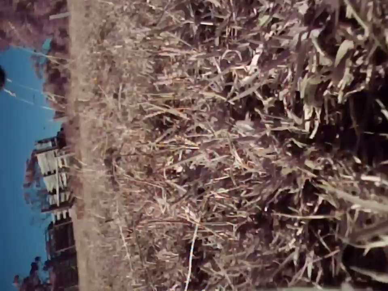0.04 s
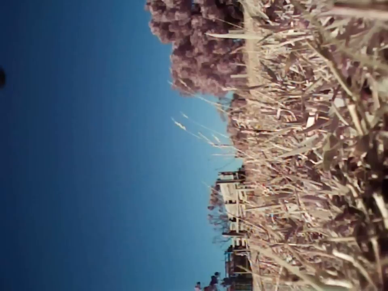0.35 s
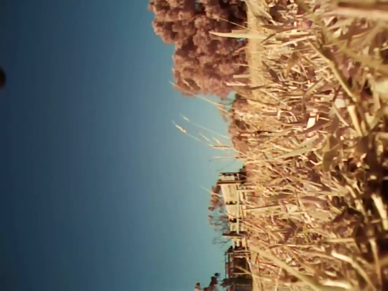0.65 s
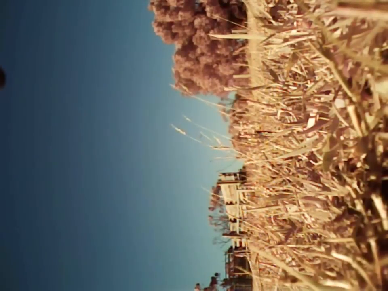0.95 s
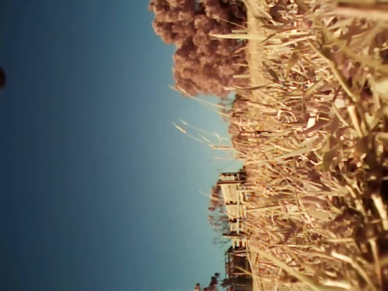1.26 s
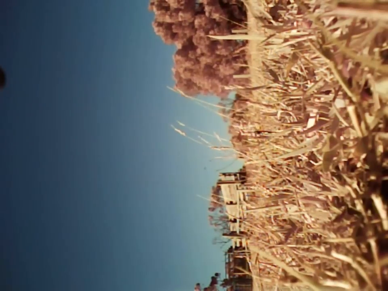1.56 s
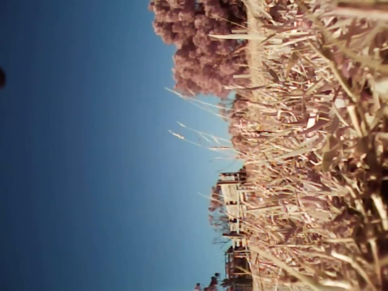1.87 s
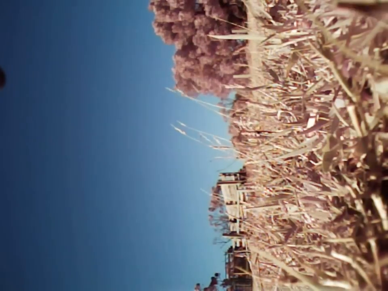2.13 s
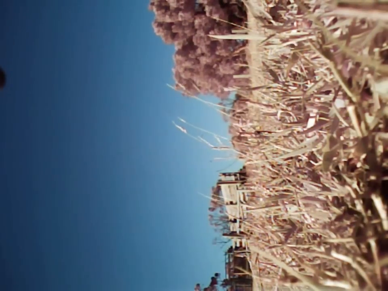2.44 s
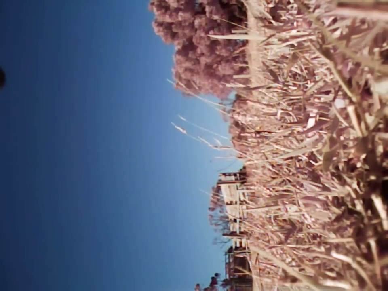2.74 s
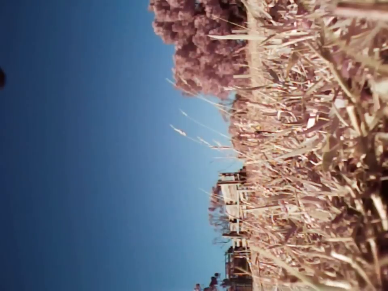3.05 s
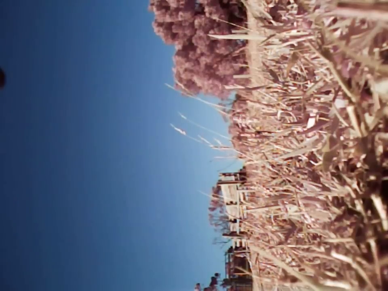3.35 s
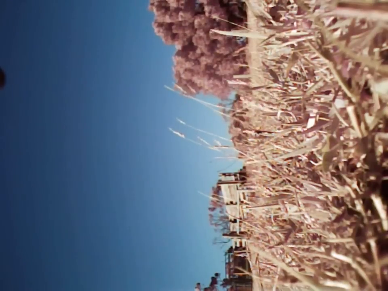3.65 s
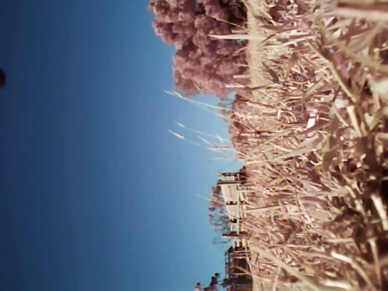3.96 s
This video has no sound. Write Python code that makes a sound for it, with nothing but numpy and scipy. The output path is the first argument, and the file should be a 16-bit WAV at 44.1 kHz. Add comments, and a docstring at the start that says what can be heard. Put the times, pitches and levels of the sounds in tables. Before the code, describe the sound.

A toy helicopter crashes into dry grass right at the start, heard from its own microphone. Blades chop stalks while the plastic hull thuds, clacks and drags, loud and distorted, stopping by 0.6 seconds. A faint gritty hiss and thin electronic whine continue throughout. Light wind puffs pass, mostly from 2 seconds on, and stalks tick against the hull at about 1.7 and 3.4 seconds.

```python
"""A toy helicopter drops into dry grass, heard from a tiny camera on its own body.
Hiss, a thin whine and a faint breeze are there from the start, made gritty by a coarse converter.
At once the blades chop into the stalks. The hull clacks, thuds, tumbles and drags for half a second,
overloading the microphone. Then it lies still: light gusts pass, and stalks tick on the hull."""
import sys
import numpy as np
from scipy import signal
from scipy.fft import rfft, irfft
from scipy.io import wavfile

SR = 44100
rng = np.random.default_rng(int(sys.argv[2]) if len(sys.argv) > 2 else 0)


def store_wav(level_fs):
    """Save 16-bit WAV to argv[1]."""
    pcm = np.round(np.clip(np.atleast_2d(level_fs), -1, 1) * 32767)
    wavfile.write(sys.argv[1], SR, pcm.T.astype(np.int16))


N = 176400
TIME = np.arange(N) / SR


def from_db(db):
    """Turn decibels into a number to multiply by."""
    return 10 ** (np.asarray(db) / 20)


def rms_one(x):
    """Scale a sound so that its average strength (rms) is 1."""
    return x / np.sqrt(np.mean(x ** 2) + 1e-20)


def butter(x, hz, kind, order):
    """Keep the "low" or the "high" part of a sound."""
    return signal.sosfilt(signal.butter(order, hz, kind, fs=SR, output="sos"), x)


def slow_noise(hz):
    """A random wobble of strength 1, mostly slower than hz."""
    return rms_one(butter(rng.standard_normal(N + SR), hz, "low", order=2)[SR:])


def resonate(x, hz, width_hz):
    """Let a sound ring around one pitch; a narrow width rings longer."""
    r = np.exp(-np.pi * width_hz / SR)
    b = (1 - r * r) / 2 * np.array([1, 0, -1])
    a = [1, -2 * r * np.cos(2 * np.pi * hz / SR), r * r]
    return signal.lfilter(b, a, signal.lfilter(b, a, x + 1e-18))


def noise_band(hz, width_hz):
    """Noise of strength 1 around one pitch."""
    return rms_one(resonate(rng.standard_normal(N), hz, width_hz))


def grains(per_s=5000, spread_db=3.5):
    """Dense random clicks of uneven size."""
    sizes = from_db(spread_db * np.minimum(rng.exponential(1, N), 4))
    signs = rng.choice([-1, 1], N)
    return sizes * signs * (rng.random(N) < per_s / SR)


def shake(resonances, force):
    """Tiny clicks make an object ring; its strength follows the force."""
    out, power = 0, 0
    for pitch_hz, width_hz, level_db in resonances:
        clicks = from_db(level_db) * grains()
        out = out + resonate(clicks * force, pitch_hz, width_hz)
        power += np.mean(resonate(clicks, pitch_hz, width_hz) ** 2)
    return out / np.sqrt(power)


# the tone of the microphone's hiss, from low to high: pitch_hz, relative_db
HISS_COLOUR = [(30, 1.5), (150, -1.5), (650, -3.5), (1500, -8), (4000, -20.5), (9000, -22), (16000, -28.5)]
def electronics(hiss_db=-42, whine_db=-51, whine_hz=8845):
    """The camera's electronics add a dull hiss and a thin, steady whine."""
    pitch_hz, relative_db = np.transpose(HISS_COLOUR)
    all_hz = np.fft.rfftfreq(N, 1 / SR)
    colour = from_db(np.interp(np.log(all_hz + 1), np.log(pitch_hz), relative_db))
    hiss = rms_one(irfft(rfft(rng.standard_normal(N)) * colour, N))
    whine = np.sin(2 * np.pi * whine_hz * TIME)
    return from_db(hiss_db) * hiss + from_db(whine_db) * whine


def breeze(level_db=-55.5, pitch_hz=140.6):
    """Gently moving air rumbles on the microphone."""
    return from_db(level_db) * noise_band(pitch_hz, width_hz=1.5 * pitch_hz)


# the hull sliding through the grass: time_s, crackle_db, rumble_db
DRAG_LEVELS = [(0, -36.5, -21.5), (0.029, -50, -26.5), (0.048, -28, -11.5), (0.066, -25, -22),
               (.15, -12, -6), (0.241, -21, -11.5), (0.274, -21, -13.5), (0.311, -9.5, -14),
               (0.337, -12, -16), (.36, -20, -19), (.40, -14, -23.5), (0.429, -8.5, -12), (.45, -23, -19.5),
               (0.473, -19, -20), (.50, -11.5, -22.5), (.53, -22.5, -29), (.56, -28, -27.5),
               (0.589, -36, -37), (0.661, -65, -39)]
def drag_forces(flutter_db=1.5):
    """How hard the dragging hull rubs its shell (unevenly) and shakes its frame."""
    time_s, crackle_db, rumble_db = np.transpose(DRAG_LEVELS)
    wobble_db = flutter_db * slow_noise(hz=70)
    crackle = from_db(np.interp(TIME, time_s, crackle_db, right=-np.inf) + wobble_db)
    rumble = from_db(np.interp(TIME, time_s, rumble_db, right=-np.inf))
    return crackle, rumble


def burst(start_s, decay_s):
    """The force of a hit: it jumps to 1, then dies away."""
    return (TIME >= start_s) * np.exp(-np.abs(TIME - start_s) / decay_s)


# blades and hull hitting the ground: start_s, crack_db, knock_db, snap_db, decay_s
GROUND_HITS = [(0.0297, -13.5, -32.5, -35, 0.0015), (0.055, 7, -0.5, -10.5, 0.022),
               (0.067, 17, -10, -27, 0.0049), (0.075, 7.5, -5, 2.5, 0.014), (0.096, 12.5, 1, 1, 0.0035),
               (0.108, 14, 12.5, -35, 0.0058), (0.126, 4, 6, -32, 0.0053), (.141, -11, -1, -5.5, 0.0027),
               (0.1534, 3, 5.5, -3, 0.004), (.175, 11.5, 8, -15, 0.005), (.203, -32, -15, -41, 0.0054),
               (0.2071, 8, 9.5, -18, 0.0039), (0.2279, 10, -2.5, -4, 0.0026),
               (0.238, -8.5, -36, -21, 0.0031), (0.289, 0, -11, -23, 0.0019),
               (0.311, -14, -11.5, -36, 0.0048), (0.3377, -12.5, -4.5, -27, 0.0021),
               (0.3686, -11, -17, -20, 0.0044), (0.391, 11.5, 1, 12, 0.0027),
               (0.409, -31, -16, -17, 0.0048), (.436, -6.5, -19, -12.5, 0.0056),
               (.458, -3, -2.5, -21, 0.0036), (0.506, -32, -17, -11.5, 0.0088),
               (0.5463, -12, -9, -18.5, 0.00074)]
def hit_forces():
    """How hard the hits crack against the shell, knock the frame and snap stalks."""
    cracks, knocks, snaps = 0, 0, 0
    for start_s, crack_db, knock_db, snap_db, decay_s in GROUND_HITS:
        hit = burst(start_s, decay_s)
        cracks = cracks + from_db(crack_db) * hit
        knocks = knocks + from_db(knock_db) * hit
        snaps = snaps + from_db(snap_db) * hit
    return cracks, knocks, snaps


# how each part rings: pitch_hz, width_hz, relative_db
SHELL_RINGS = [(1449, 860, 1.5), (2059, 740, 3), (2556, 540, -2), (3404, 380, -10.5), (6050, 2700, -18.5)]
MUFFLED_FRAME_RINGS = [(254, 406, 3.5), (460, 390, -5), (988, 790, -16.5)]   # pressed against the ground
FREE_FRAME_RINGS = [(126.3, 160, -7.5), (215.2, 70, 0), (282.5, 62, 1.5), (389, 110, -3.5), (488, 84, -0.5),
                    (672, 230, -7), (926, 510, -17)]
STALK_RINGS = [(4160, 2600, 0.5), (6850, 3500, 3), (10400, 8800, -8.5)]
def crash(bump_db=-4.5, ring_on_db=-5, drag_snap_db=-30):
    """Dragging and hits shake the plastic shell and the frame, and snap dry stalks."""
    crackle, rumble = drag_forces()
    cracks, knocks, snaps = hit_forces()
    bumps = from_db(bump_db) * rumble * slow_noise(hz=61.7)   # slow jolts of the hull
    shell = shake(SHELL_RINGS, crackle + cracks)
    muffled_frame = shake(MUFFLED_FRAME_RINGS, knocks)
    free_frame = shake(FREE_FRAME_RINGS, rumble + from_db(ring_on_db) * knocks)
    stalks = shake(STALK_RINGS, from_db(drag_snap_db) * crackle + snaps)
    return bumps + shell + muffled_frame + free_frame + stalks


# hard parts of the hull meeting: start_s, pitch_hz, level_db, decay_s
HULL_CLACKS = [(0.0307, 1750, -20, 0.0046), (0.2284, 2700, 1, 0.0026), (0.459, 3260, -1, 0.0021)]
def clacks():
    """Hard parts knock together, each time ringing briefly at one pitch."""
    out = 0
    for start_s, pitch_hz, level_db, decay_s in HULL_CLACKS:
        age_s = np.maximum(TIME - start_s, 0)
        out = out + from_db(level_db) * np.sin(2 * np.pi * pitch_hz * age_s) * np.exp(-age_s / decay_s)
    return out


# air squeezed against the microphone as the hull lands: start_s, length_s, level_db
AIR_SHOVES = [(0.051, 0.02, 2.5), (0.083, .033, 11), (0.391, .007, 14)]
def shoves():
    """Air pushes the microphone one way, to its limit, which chokes the crackle."""
    out = 0
    for start_s, length_s, level_db in AIR_SHOVES:
        progress = np.clip((TIME - start_s) / length_s, 0, 1)
        out = out + from_db(level_db) * np.sin(np.pi * progress)
    return out


# the hull's low ring on soil: pitch_hz, width_hz, relative_db
THUD_RINGS = [(136, 162, 3.5), (297, 227, 1.5)]
def thud(level_db=16.5):
    """The first landing booms through the hull."""
    return shake(THUD_RINGS, from_db(level_db) * burst(start_s=0.056, decay_s=0.016))


# puffs of wind: middle_s, half_width_s, level_db, pitch_hz
WIND_GUSTS = [(0.979, 0.016, -39.5, 130), (1.37, 0.025, -45, 111), (2.075, 0.035, -32.5, 135.2),
              (2.147, 0.014, -33.5, 139.2), (2.219, 0.043, -37, 115.5), (2.332, 0.021, -39, 95.8),
              (2.529, 0.038, -35.5, 110), (2.62, 0.019, -36.5, 132.4), (2.721, 0.054, -35.5, 114.8),
              (3.032, 0.054, -37, 138.3), (3.133, .025, -27.5, 229), (3.262, 0.061, -34, 162),
              (3.501, 0.099, -41, 121), (3.75, 0.086, -42, 109.7)]
def gusts(swirl_db=-5):
    """Gusts swell and fade on the microphone, each with low swirls of air under it."""
    air = rng.standard_normal(N)
    swirls = from_db(swirl_db) * noise_band(90.3, width_hz=110)
    out = 0
    for middle_s, half_width_s, level_db, pitch_hz in WIND_GUSTS:
        swell = np.exp(-0.5 * ((TIME - middle_s) / half_width_s) ** 2)
        rush = rms_one(resonate(air, pitch_hz, width_hz=1.5 * pitch_hz))
        out = out + from_db(level_db) * swell * (rush + swirls)
    return out


# stalks tapping the hull: start_s, level_db
STALK_TAPS = [(1.667, -28.5), (1.685, -23), (3.405, -17.5)]
# how the shell rings when lightly tapped: pitch_hz, width_hz, relative_db
TAP_RINGS = [(1680, 760, -1.5), (2300, 710, -3.5), (3100, 640, -7.5), (6130, 550, -9.5)]
def ticks():
    """Stalks spring back against the resting hull, which rings for about a millisecond."""
    taps = np.zeros(N)
    for start_s, level_db in STALK_TAPS:
        taps[int(start_s * SR)] = from_db(level_db)
    rings = sum(from_db(db) * resonate(taps, hz, width_hz) for hz, width_hz, db in TAP_RINGS)
    return rings * taps.max() / np.abs(rings).max()


def scene():
    """All the sounds added together in one channel."""
    return (electronics() + breeze() + crash() + clacks() + shoves() + thud() + gusts() + ticks())[None]


def coarse_converter(x, step=0.033, smallest_heard=0.011):
    """Holding every second sample and rounding it to big steps makes quiet sound gritty."""
    sampled = x[:, ::2]
    step_count = np.ceil(np.maximum(np.abs(sampled) - smallest_heard, 0) / step)
    steps = step * np.sign(sampled) * step_count
    steps = steps - 0.018 * (steps > 0) + 0.027 * (steps < 0)   # a dead zone pulls both sides toward zero
    return np.repeat(steps, 2, axis=1)


def record(dry, overload=0.98, ceiling=0.87):
    """The microphone overloads on loud sound; the converter adds grit, then the top treble is cut."""
    squashed = dry / (1 + (dry / overload) ** 8) ** (1 / 8)
    sagged = butter(squashed, hz=18, kind="high", order=1)   # a steady push sinks back to zero
    gritty = coarse_converter(np.clip(sagged, -ceiling, ceiling))
    smoothed = butter(gritty, hz=11650, kind="low", order=8)
    treble_cut = signal.cheby2(12, 60, 15800, fs=SR, output="sos")   # 60 dB down from 15800 Hz up
    return signal.sosfilt(treble_cut, np.clip(smoothed, -ceiling, ceiling))


dry = scene()
out = record(dry)
store_wav(out)
```